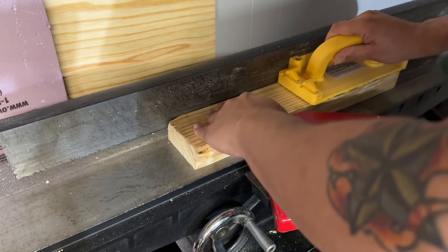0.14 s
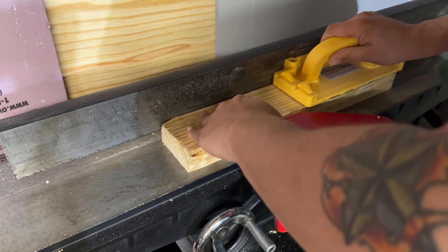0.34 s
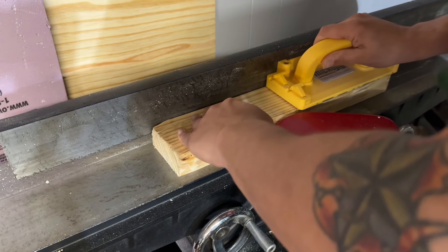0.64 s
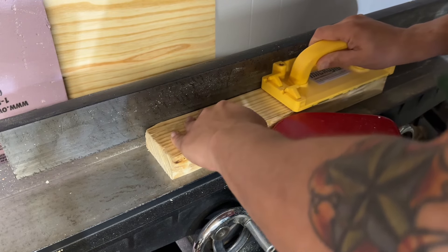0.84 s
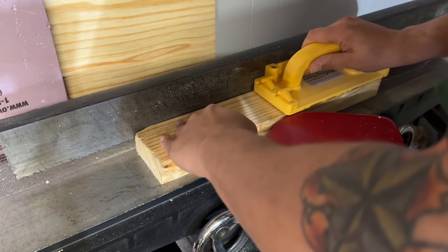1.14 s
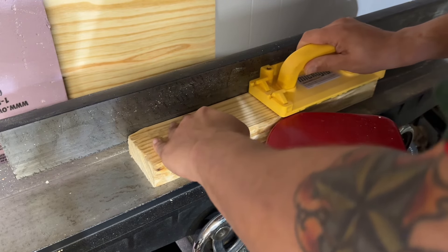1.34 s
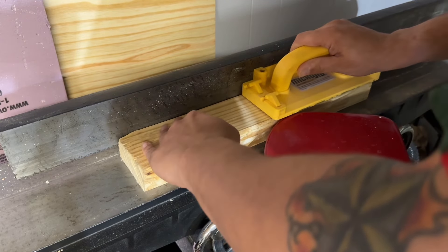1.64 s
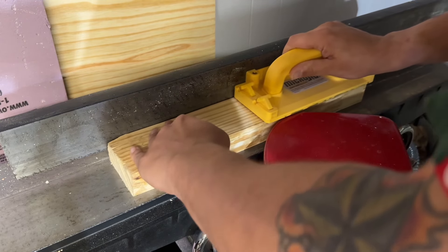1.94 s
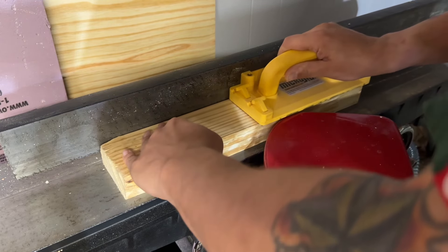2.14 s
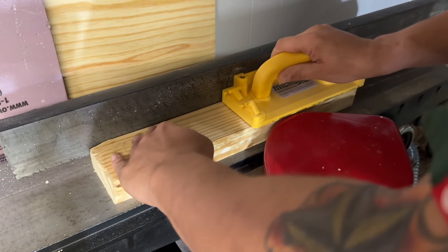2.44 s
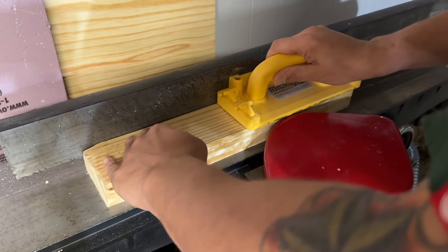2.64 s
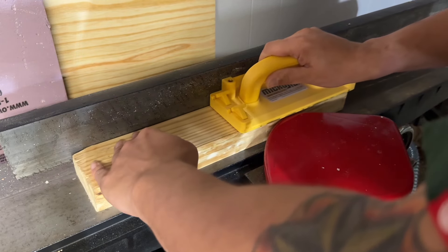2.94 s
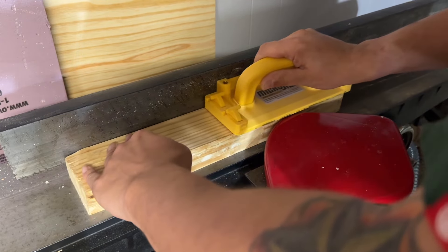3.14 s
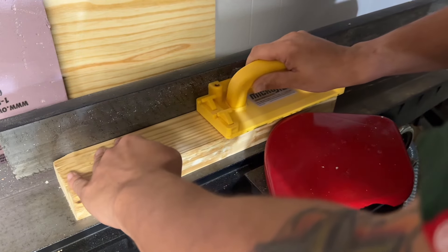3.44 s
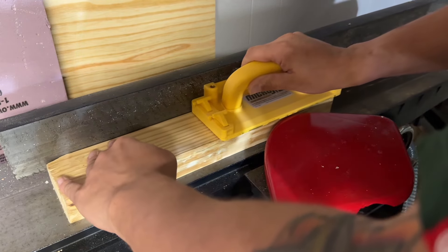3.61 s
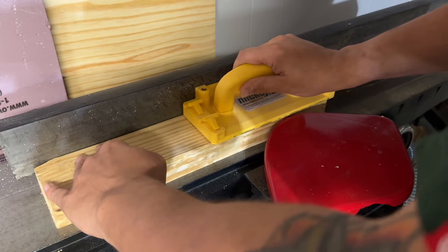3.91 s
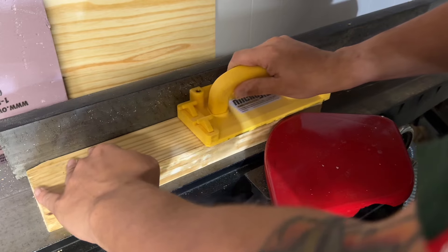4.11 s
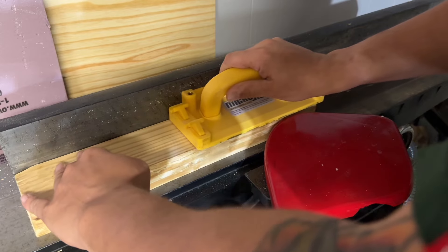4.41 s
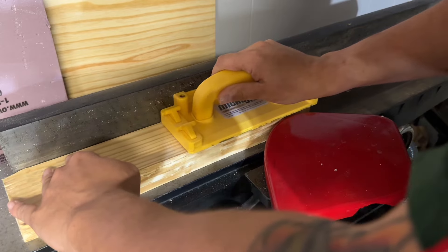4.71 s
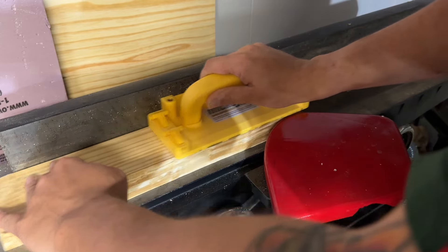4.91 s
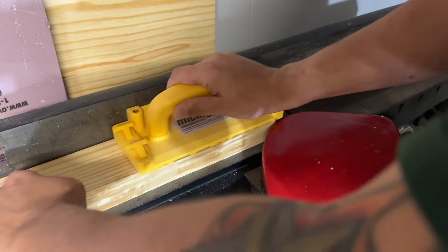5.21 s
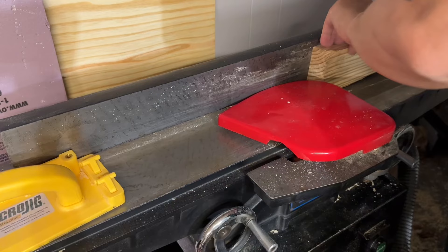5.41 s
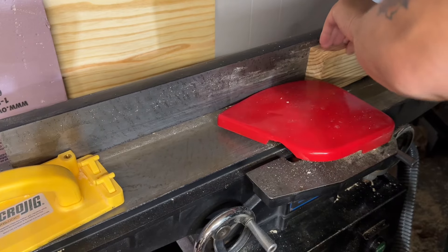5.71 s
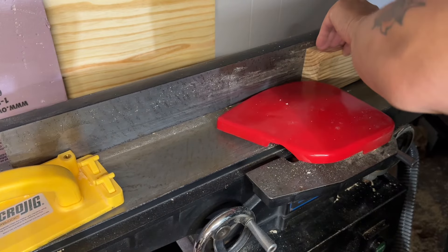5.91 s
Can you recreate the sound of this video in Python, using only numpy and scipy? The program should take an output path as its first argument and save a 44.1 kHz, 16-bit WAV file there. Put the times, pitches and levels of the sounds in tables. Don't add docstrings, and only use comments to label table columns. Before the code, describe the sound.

Harsh buzzing and tearing as spinning knives shave a wooden board, a last rasp, then a much quieter motor hum with rushing air in a workshop.

```python
import sys
import numpy as np
from scipy import signal
from scipy.fft import rfft, irfft
from scipy.io import wavfile
from scipy.ndimage import uniform_filter1d

SR = 44100
rng = np.random.default_rng(int(sys.argv[2]) if len(sys.argv) > 2 else 0)


def put_to_file(sound):
    columns = np.atleast_2d(sound).T
    safe = np.clip(columns, -1, 1)
    whole_steps = np.round(safe * 32767)
    wavfile.write(sys.argv[1], SR, whole_steps.astype(np.int16))


def how_loud(loudness_db):
    steps = np.asarray(loudness_db, float) / 20
    return 10 ** steps


N = 267246
T = np.arange(N) / SR
EXIT_S, CHANGE_S = 4.89, 5.446

# frequency in Hz, likeness 0-1, lead of the right port in rad.
PORTS = [(60, .99, 0), (200, .9, -.1), (800, .75, .25), (1000, .5, -1.1), (1500, .5, -1.7),
         (2500, .4, -1.5), (4000, .35, -.7), (7000, .5, -1.2), (8400, .9, .25), (9200, .7, .7),
         (9800, .55, 1.9), (10800, .9, 3.1), (12200, .9, 3.2), (13500, .9, 6.2)]
# level in dB, time in seconds when a node lies over
# the knives, node spacing in seconds, leak at the node 0-1, swell of the free tail in dB.
RINGS = [
    (-29, 2.7, 4.64, 0.39, -1),
    (-23.5, 1.7, 16.1, 0.18, -1),
    (-28.5, 3.22, 5.8, 0.37, 10.5),
    (-33, 3.99, 3.63, 0.41, 4.5),
    (-30.5, 3.55, 3.78, 0.51, 3),
]


def board(turns):
    # left-right in dB, swing in dB, its time in seconds,
    # its width in seconds, turn of the free tail in dB.
    ring_places = [
        (-3, -3.5, 3.4, .5, 1),
        (4, 14, 4.55, 0.44, 15),
        (1.5, -11, 3, 0.66, 8.5),
        (-2, 15, 2.98, 1.18, 2),
    ]
    # level against the board's ring in dB,
    # left-right in dB, change at the free tail in dB.
    knife_pattern = [(-21.5, 7, 3.5), (-24.5, 10, 4), (-50.5, 15, -16), (-15, -2, 3.5), (-14, 15, 1),
                     (0, -4, 0), (-12, 34, -7), (-2, -45, -9), (0, 3, 0), (-20, 20, 9.5), (-4, -30, -11),
                     (0, 0, 0), (-10.5, 17, -23), (-4, -13, -6), (0, 1, 0), (-17.5, 7, 6.5), (-37, -12, 32),
                     (-10.5, 0, 8.5), (-6, -6, -13), (-14.5, 6.5, 5), (-11, 11.5, 5.5), (-19.5, 30, 5.5),
                     (-22, 25, 0), (-12.5, 38, 5), (-14, -20, -3.5), (-24.5, -16, 14), (-11, 3, 2),
                     (-22, -0.5, 3), (-15.5, 22.5, 10.5), (-15.5, -15, 7.5)]
    half_orders = [6.5, 7.5, 13.5]
    # level against the board's ring in dB, left-right in dB, change at the free tail in dB.
    rocking = [
        (-24.5, -5, -1),
        (-12.5, 13.5, -34),
        (-32.5, 14, -14),
    ]
    loaded_hz, belt_hz = 80.8, 19.7
    growl_db = -32.5 + 7 * bump(4.26, 0.57)
    rings = np.array([growl_db] + [ring_db(*row) for row in RINGS])
    anchors = [8, 9, 12, 15, 18, 27]
    loose = np.clip((T - 3.8) / .45, 0, 1)

    flare_s, flare_from, flare_to, flare_db, flare_drop_db = .08, 15.5, 30.5, 5, -17
    last = np.clip(1 + (T - EXIT_S) / flare_s, 0, 1)
    flare = np.log(flare_from) + last * np.log(flare_to / flare_from)

    places = [db + swing_db * bump(s, width) + tail_db * tail_free()
              for db, swing_db, s, width, tail_db in ring_places]
    places = np.array([0 * T] + places + [0 * T])
    orders = list(range(4, 4 + len(knife_pattern))) + half_orders
    spreads = rng.standard_normal((len(orders), 2))
    out = np.zeros((2, N))
    for k, (db, pan_db, loose_db), (start, spread) in zip(orders, knife_pattern + rocking, spreads):
        share = np.array([np.interp(k, anchors, row) for row in np.eye(len(anchors))])
        free = 1 - share[1:5].max()
        drift = wander(1.244, count=3)
        pan = free * (pan_db + 0.76 * drift[0]) + (1 - free) * (share @ places)
        start_scale = 1.1 if k % 3 else .95
        angle = 2 * np.pi * k * turns + start_scale * start + .2 * drift[2]
        lead = read(PORTS, k * loaded_hz, order=2) + 0.64 * spread * free
        level = how_loud((db + loose_db * loose) * (free > 0) + share @ rings + 1.8 * free * drift[1])
        near_flare = np.exp(-((np.log(k) - flare) / .27) ** 2)
        drop_db = flare_drop_db * last
        level = level * how_loud(np.sqrt(last) * (k > 10) * (drop_db + (flare_db - drop_db) * near_flare))
        left, right = sides(pan)
        port_sum = np.maximum(abs(left + right * np.exp(1j * lead)) / 2, .5)
        level = level / port_sum ** (1 - free / 2)
        out += np.sqrt(2) * level * [left, right] * np.cos([angle - lead / 2, angle + lead / 2])

    shudder = chatter()[0] * np.tanh(wander(55)[0])
    shudder += 0.61 * np.cos(2 * np.pi * belt_hz * T)
    shudder += .9 * np.cos(np.pi * turns)
    return out * how_loud(shudder)


def chips(turns):
    knives_db = [
        0,
        -2,
        -7,
    ]
    # time in seconds, tearing level in dB.
    bite = [
        (0.0, -33.5),
        (1.12, -34),
        (1.31, -34),
        (2.15, -33),
        (2.84, -33),
        (3.5, -30.5),
        (4.08, -32),
        (4.75, -26.5),
        (4.85, -24),
    ]
    # frequency in Hz, dB per Hz.
    wood_color = [(150, -19), (300, -11.5), (500, -8.5), (800, -5.5), (1150, 11.5), (1450, 0), (1650, 8),
                  (1900, 4.5), (2300, -28)]
    crack_color = [(1300, -23), (1900, -1), (2600, 14.5), (3000, -22), (3600, -40)]
    hiss_color = [(2400, -9), (2800, -0.5), (3200, -1.5), (3700, 0.5), (4400, -1.5), (5000, -0.5),
                  (5700, -2), (6600, -1.5), (7250, -2), (8600, 1.5), (9300, -2.5), (11300, -4),
                  (12600, -16), (13800, -23)]
    fizz_color = [(10000, -16), (12000, -6), (13200, -3), (16000, -6.5)]
    # time in seconds, width in seconds,
    # level against the tearing in dB.
    singing = [(.5, .6, -17), (.9, .6, -14), (1.2, .7, -16), (3.8, .45, -12), (4.55, .35, -11),
               (4.6, .3, -14), (4.6, .35, -15), (.4, .8, -12)]
    singing_hz = [4100, 4750, 3450, 6030, 2690, 4000, 5200, 1700]
    singing_width_hz = 200

    bite_db = curves(bite)[0]
    torn = bump(4.875, 0.0093)
    crack_db = ring_db(*RINGS[-1])
    hiss_db = 2 + bite_db + 5.5 * torn
    fizz_db = -43 + 1.1 * (bite_db - bite[0][1]) + 1 * torn
    pan_db = 3 + 8 * tail_free() * (1 - torn)

    knives_db = np.array(knives_db)
    grain_db = rng.standard_normal(2000)
    count = np.floor(3 * turns).astype(int)
    blow = how_loud(knives_db[count % 3] + 2.2 * grain_db[count])
    puff = evened(.9 + blow * np.exp(-(3 * turns % 1) / .27))

    count = np.round(3 * turns).astype(int)
    samples = (turns - count / 3) / np.gradient(turns)
    blow = how_loud(knives_db[count % 3] + 1.2 * grain_db[count])
    clicks = blow * np.sinc(samples) * np.exp(-(samples / 12) ** 2)

    t, hz = np.arange(2000) / SR, np.fft.rfftfreq(N, 1 / SR)
    snaps = 0
    for k in range(3):
        decay = how_loud(-60 * t / .006) + .3 * how_loud(-60 * t / .04)
        ring = rng.standard_normal((2, len(t))) * decay
        moved = clicks * np.cos(1.72 * T + k * np.pi / 3)
        snaps = snaps + signal.oaconvolve(moved[None], ring)[:, :N]
    left, other = rfft(snaps) * how_loud(read(hiss_color, hz)) * (hz > 2700) / np.sqrt(1 + (hz / 6500) ** 4)
    same = np.clip(read(PORTS, hz), 0, 1)
    lead = read(PORTS, hz, order=2)
    right = same * np.exp(1j * lead) * left + np.sqrt(1 - same ** 2) * other
    snaps = evened(irfft([left, right], N))

    tear = how_loud(hiss_db) * (how_loud(-0.5) * puff * noise(hiss_color, comb_db=2.5) + how_loud(-7.0) * snaps)
    for (s, width, db), f in zip(singing, singing_hz):
        band = np.exp(-((hz - f) / singing_width_hz) ** 2 + 1j * np.outer([0, 1], lead))
        sung = irfft(rfft(clicks) * band, N)
        tear += how_loud(hiss_db + db) * bump(s, width) * evened(sung)
    tear += how_loud(crack_db - 8.5) * puff * noise(crack_color)

    high_pass = signal.butter(4, 7700, "high", fs=SR, output="sos")
    top = signal.sosfiltfilt(high_pass, tear)
    fizz = how_loud(fizz_db) * puff * noise(fizz_color)
    wood = how_loud(chatter()[1]) * puff * noise(wood_color, patchy_db=0.5, comb_db=2.5)
    return sides(pan_db) * (tear - top) + top + fizz + wood


def ring_db(db, node_s, spacing_s, leak, tail_db):
    drive = leak ** 2 + np.sin(np.pi * (T - node_s) / spacing_s) ** 2
    return db + 10 * np.log10(drive) + tail_db * tail_free()


def tail_free():
    return np.exp(np.minimum(T - EXIT_S, 0) / .6)


def chatter():
    # time in seconds, width in seconds, shudder in dB, rumble in dB.
    table_knocks = [
        (3.62, .06, 1, 2.5),
        (3.76, .04, 1.5, 5),
        (3.96, .06, 2, 9),
        (4.87, .025, .3, 7),
    ]
    knocks = sum(np.outer(dbs, bump(s, width)) for s, width, *dbs in table_knocks)
    shudder_db = 0.33 + knocks[0]
    rumble_db = -35.5 - 1.5 * tail_free() + knocks[1]
    return shudder_db, rumble_db


def shaft_hz():
    # time in seconds, turns per second.
    cutterhead_speed = [
        (0, 80.78),
        (1.7, 80.79),
        (3.7, 80.82),
        (4.1, 81),
        (4.4, 81.3),
        (4.79, 81.3),
        (4.86, 82.1),
        (4.97, 83.1),
        (5.05, 83.27),
    ]
    return curves(cutterhead_speed)[0]


def machine(hz, turns):
    # level loaded in dB, idle in dB,
    # after the scene changes in dB, left-right in dB, lead of the right port in rad.
    whistle = [(-33.5, -36, -32.5, 1, -0.39), (-37, -37, -30.5, -0.5, 1.13), (-96.5, -42.5, -39, 1, 0.98),
               (-60.5, -45, -35.5, -1.5, 1.4), (-85, -46.5, -54, 13, -0.83), (-71, -74, -44, 8, -1.4),
               (-64, -67, -73, -6, 4.2), (-64, -68, -55, 1, .9), (-82.5, -72, -53, 11, 0),
               (-52, -60, -60, 0, -0.68), (-62, -62, -56, -24, -1)]
    # idle frequency in Hz, level loaded in dB, idle in dB,
    # after the scene changes in dB.
    motor_tones = [(61, -56, -55, -50.5), (78.5, -60.5, -56, -52), (119.8, -65, -62, -71),
                   (199, -63.5, -60, -53.5), (237.1, -55.5, -45, -42), (274.8, -65, -49.5, -47.5),
                   (291.6, -69, -58, -47), (336, -68, -63, -81), (426, -74, -56, -53),
                   (429, -75.5, -60, -48), (461.2, -44, -44, -44.5), (479, -62.5, -59, -58),
                   (522, -55, -56, -54), (668, -79.5, -57, -52), (1253, -66, -57, -45)]
    # frequency in Hz, dB per Hz.
    air_color = [(30, -30), (42, -14), (60, -10.5), (90, -8), (140, -2.5), (300, 0), (450, 0), (1600, 4),
                 (1760, -3), (3000, -9), (7000, -13.5), (8600, -18), (11000, -19), (16000, -22)]
    air_db = (-35.5, -34.5, -32)
    # frequency in Hz, left-right in dB.
    air_pan = [(100, -11), (1500, -2), (3000, 1), (6500, 8), (8600, 8), (10000, -8.5)]
    idle_hz = 83.27

    air_pan_db = read(air_pan, np.fft.rfftfreq(1024, 1 / SR))
    out = stage(*air_db) * noise(air_color, air_pan_db, comb_db=.7)
    for k, (*levels_db, pan_db, lead) in zip(range(3, 36, 3), whistle):
        pan = np.interp(T, [3.6, 4.3], [10.5 * (k == 6), pan_db])
        angle = 2 * np.pi * (k * turns + rng.random())
        right_angle = angle + lead * np.clip(T - 3.6, 0, 1) - 0.32 * (T < 3.6)
        level = stage(*levels_db) * how_loud(0.32 * wander(9))
        out += np.sqrt(2) * level * sides(pan) * np.cos([angle, right_angle])
    motor = np.cumsum(1 - .45 * (1 - hz / idle_hz)) / SR
    for f, *levels_db in motor_tones:
        level = stage(*levels_db) * how_loud(0.54 * wander(10.0))
        out += np.sqrt(2) * level * np.cos(2 * np.pi * (f * motor + rng.random()))
    return out


def stage(loaded_db, idle_db, later_db):
    times = [4.86, 4.91, CHANGE_S, CHANGE_S + .001]
    return how_loud(np.interp(T, times, [loaded_db, idle_db, idle_db, later_db]))


def shop(x):
    # frequency in Hz, seconds to fade by 60 dB.
    room_decay = [(200, .9), (700, .55), (1300, .3), (2500, .38), (4000, .3), (10000, .14)]
    taps = np.zeros((2, SR))
    at = np.arange(300, SR - 20, 20) + rng.integers(0, 20, (2, (SR - 301) // 20))
    np.put_along_axis(taps, at, rng.choice([-1., 1.], at.shape), 1)
    hz, t, z = signal.stft(taps, SR, nperseg=256)
    fade = how_loud(-60 * t / read(room_decay, hz)[:, None])
    tail = signal.istft(z * fade, SR, nperseg=256)[1]
    return signal.fftconvolve(x, tail / np.linalg.norm(tail[0]), axes=1)[:, :N]


def noise(shape, pan_db=0, patchy_db=1.0, comb_db=4.0):
    frames, hz = N // 256 + 5, np.fft.rfftfreq(1024, 1 / SR)
    a, b, c, d, patches = rng.standard_normal((frames, 513, 5)).T
    patches = uniform_filter1d(patches, size=10, axis=0)
    patches = evened(uniform_filter1d(patches, size=12, axis=1))
    same = np.clip(read(PORTS, hz), 0, 1)[:, None]
    lead = np.exp(1j * read(PORTS, hz, order=2))[:, None]
    left = a + 1j * b
    right = same * lead * left + np.sqrt(1 - same ** 2) * (c + 1j * d)
    z = np.array([left, right])
    comb = uniform_filter1d(rng.standard_normal((frames, 513)).T, size=3, axis=0)
    comb = evened(uniform_filter1d(comb, size=150, axis=1))
    inside = (hz > shape[0][0]) & (hz < shape[-1][0])
    color = how_loud(read(shape, hz)) * inside * sides(pan_db + 0 * hz)
    z *= how_loud(patchy_db * patches + comb_db * comb) * color[..., None]
    return evened(signal.istft(z, nperseg=1024, noverlap=768)[1][:, :N])


def sides(pan_db):
    left = np.sqrt(2 / (1 + how_loud(-pan_db) ** 2))
    return np.array([left, left * how_loud(-pan_db)])


def wander(hz, count=1):
    knots = rng.standard_normal((count, 400))
    return np.array([np.interp(T * hz, np.arange(400), k) * 1.22 for k in knots])


def bump(at, width):
    return np.exp(-((T - at) / width) ** 2)


def evened(x):
    return x / np.sqrt(np.mean(x ** 2) + 1e-20)


def curves(rows):
    s, *columns = np.transpose(rows)
    return [np.interp(T, s, c) for c in columns]


def read(points, hz, order=1):
    points = np.transpose(points)
    return np.interp(np.log(hz + 1), np.log(points[0] + 1), points[order])


def scene():
    hz = shaft_hz()
    turns = np.cumsum(hz) / SR
    contact = np.clip((4.893 - T) / .016, 0, 1)
    chord = np.clip((4.9 - T) / 0.029, 0, 1) * board(turns)
    torn = contact * chips(turns)
    tail = how_loud(-11) * (1 - contact) * shop(chord) + how_loud(-11) * shop(torn)
    return chord + torn + tail + machine(hz, turns)


def roll_off(x):
    return signal.sosfilt(signal.butter(12, 15840, fs=SR, output="sos"), x)


def record(dry):
    # frequency in Hz, share in the sum,
    # share in the difference.
    lost_share = [(8000, .1, .3), (8700, .1, .6), (9300, .2, .5), (9900, .7, .3), (12300, .75, .3),
                  (13200, .5, .8), (15000, .45, .9), (15700, .9, .9)]
    ceiling = 1.1
    dip = np.interp(T, [CHANGE_S - .012, CHANGE_S, CHANGE_S + .009], [1, .3, 1])
    faded = ceiling * np.tanh(dry / ceiling) * dip
    hz, t, z = signal.stft(faded, SR, nperseg=2048, noverlap=1024)
    mid, side = (z[0] + z[1]) / 2, (z[0] - z[1]) / 2

    held = np.cumsum(rng.random(len(t)) < .7)
    low, high, top, gap = rng.random((len(t), 4))[held].T
    step_hz, hz = 340, hz[:, None]
    below = hz < 10500 - step_hz * np.floor(2.2 * low ** 1.6)
    above = hz > 12200 + step_hz * np.floor(2.6 * high ** 1.4)
    mid = mid * (below | above)
    side = side * (hz < 12700 + step_hz * np.floor(3.4 * top ** 1.2))
    side = side * ((abs(hz - 8650) > 330) | (gap > .45))

    near = uniform_filter1d(abs(z).mean(0), size=15, axis=0)
    keep_mid = abs(mid) > read(lost_share, hz) * near
    keep_side = abs(side) > read(lost_share, hz, order=2) * near
    keep = np.array([keep_mid, keep_side]) & (hz < 15800)
    mid, side = keep * [mid, side]
    both = signal.istft(np.array([mid + side, mid - side]), SR, nperseg=2048, noverlap=1024)[1][:, :N]
    return roll_off(both)


dry = scene()
out = record(dry)
put_to_file(out)
```